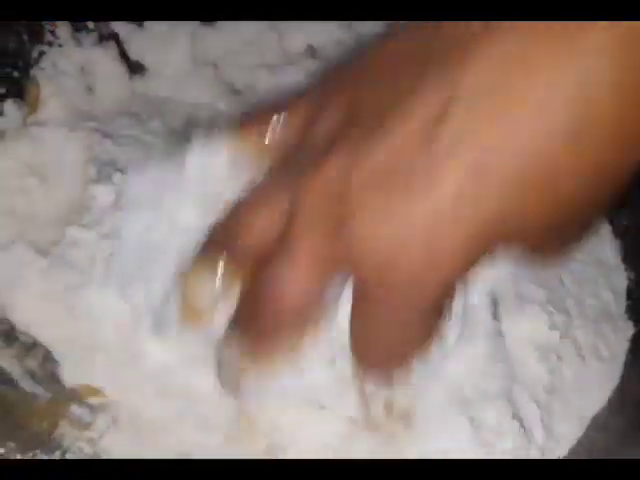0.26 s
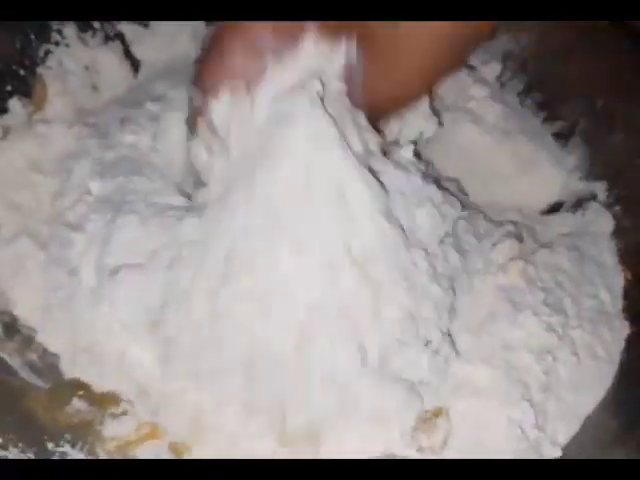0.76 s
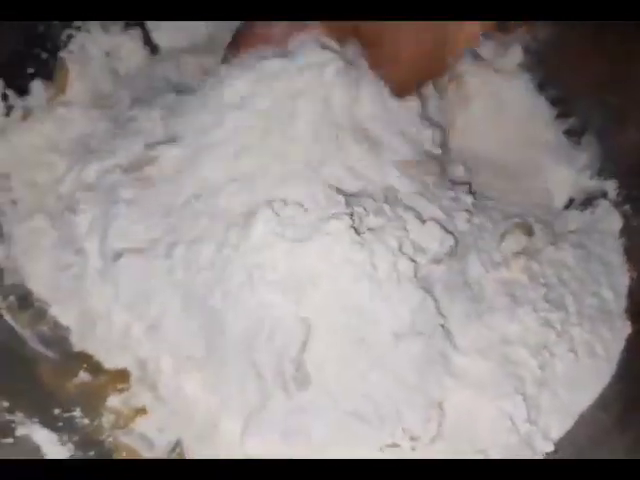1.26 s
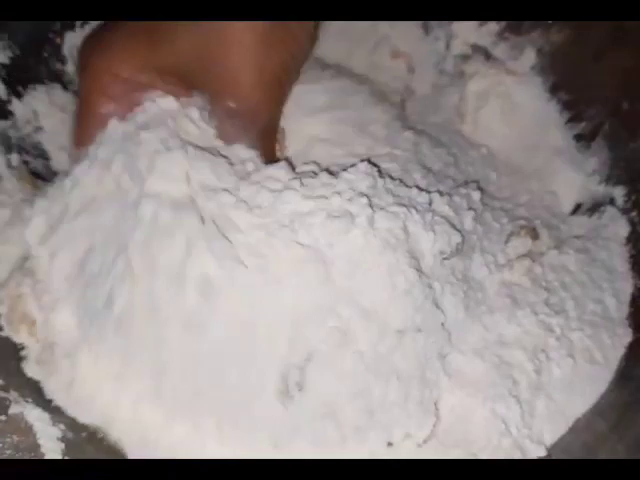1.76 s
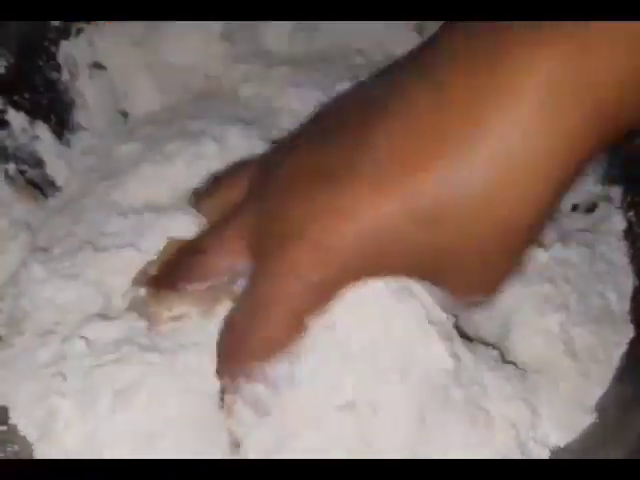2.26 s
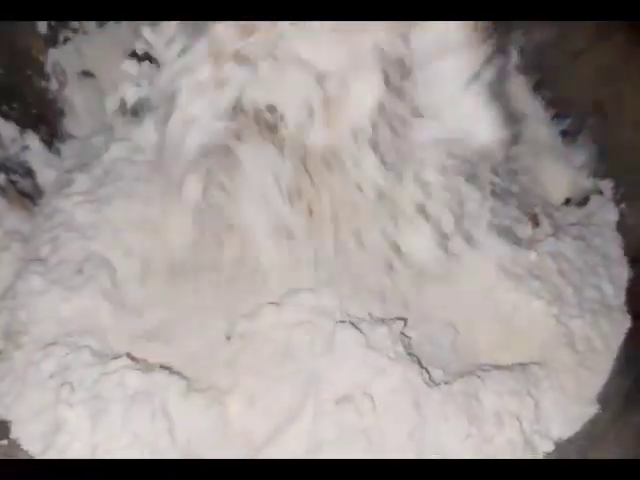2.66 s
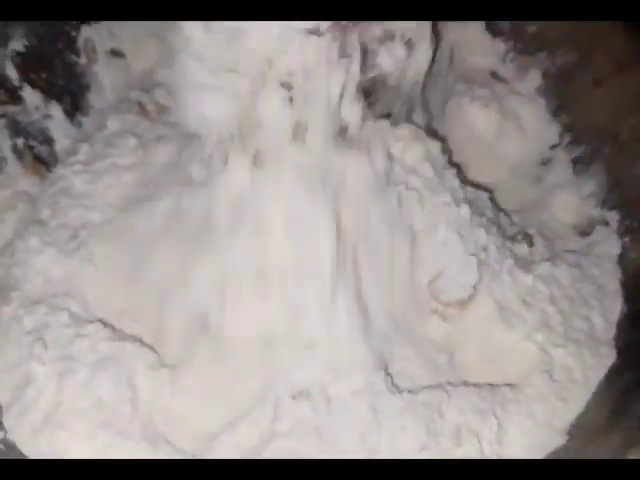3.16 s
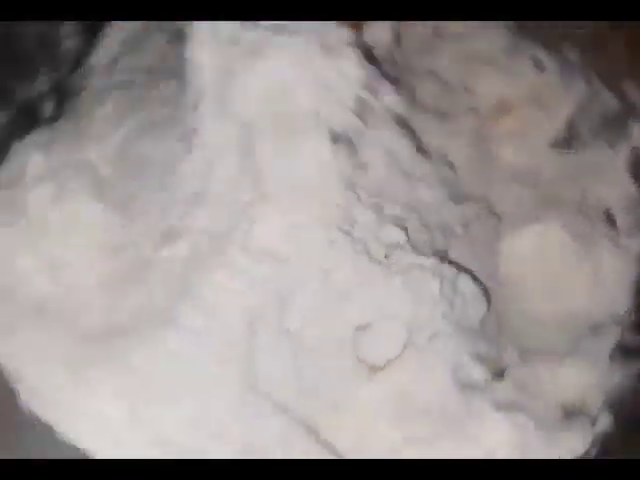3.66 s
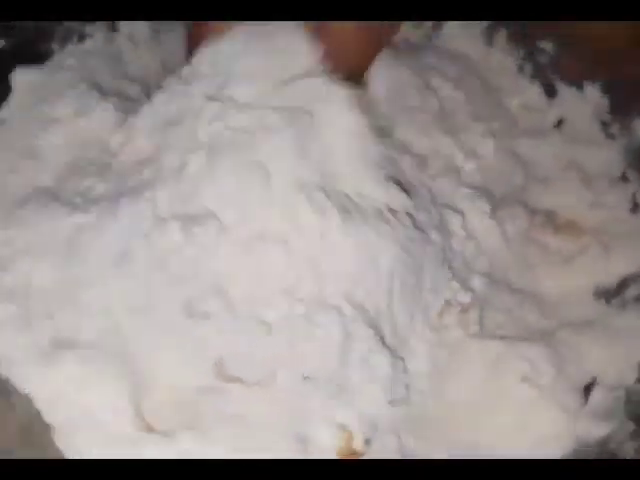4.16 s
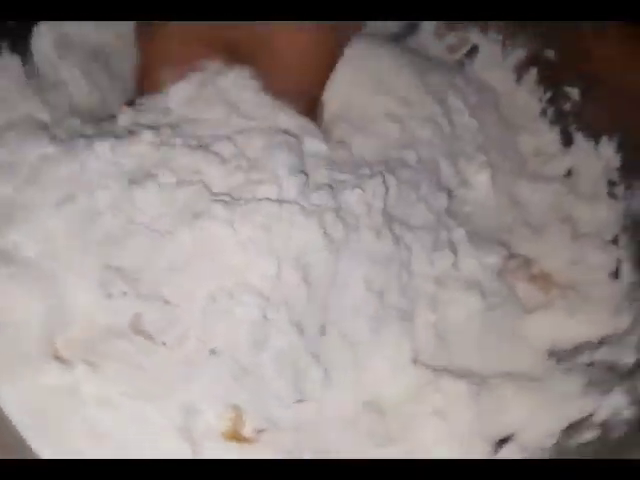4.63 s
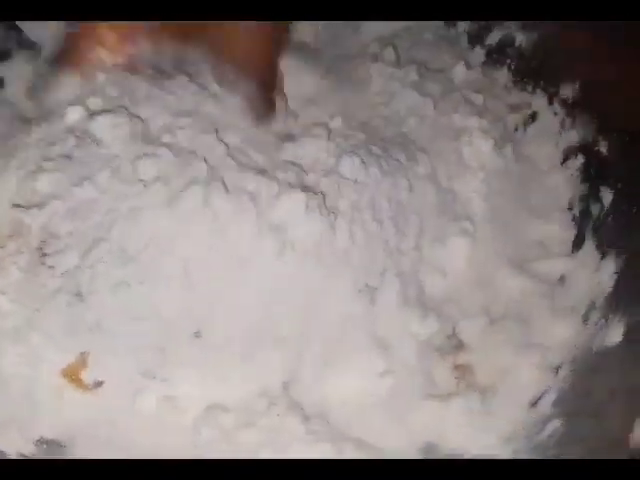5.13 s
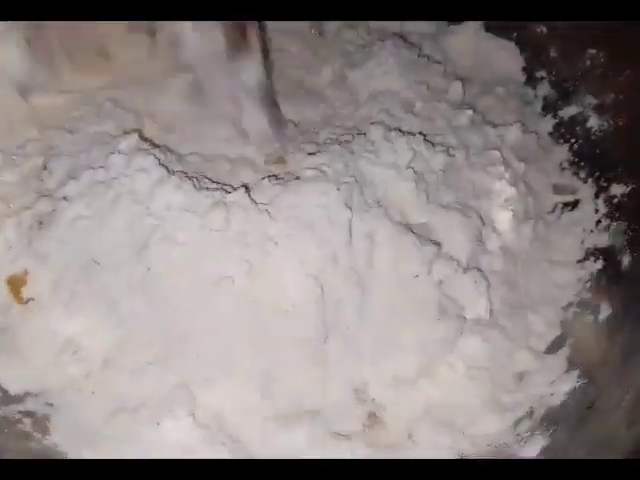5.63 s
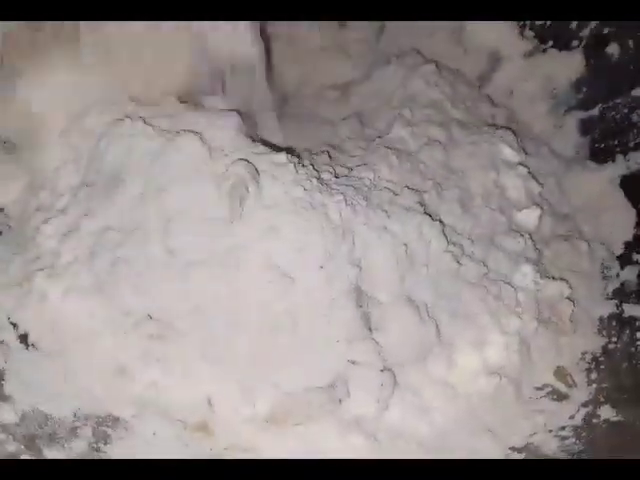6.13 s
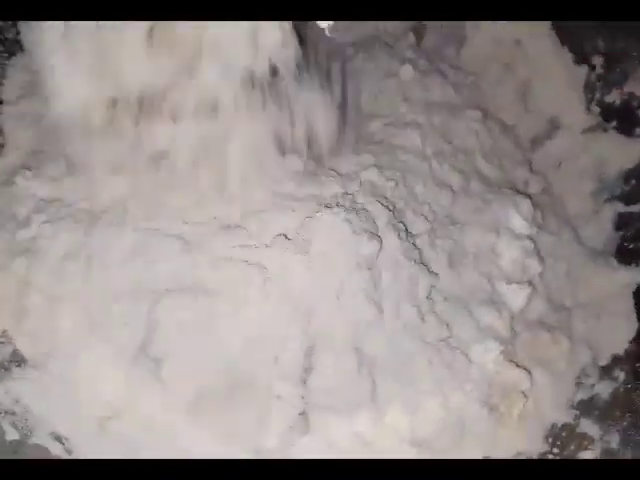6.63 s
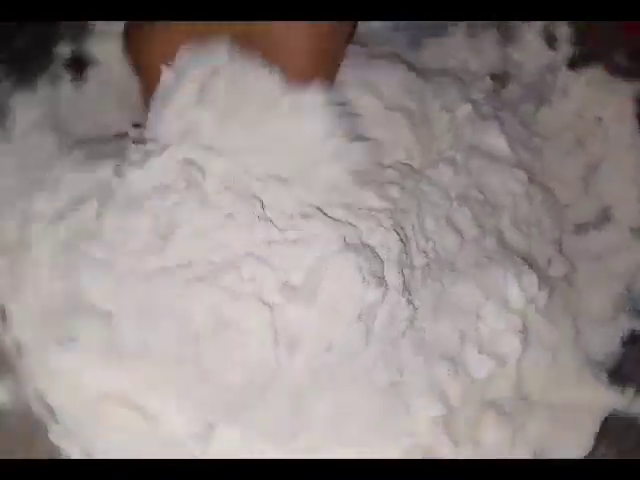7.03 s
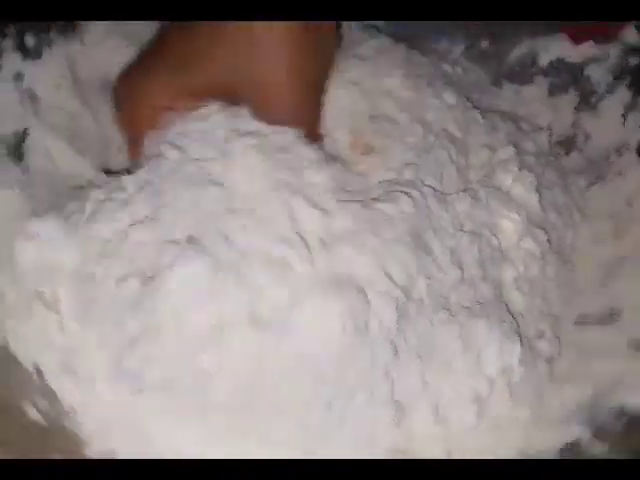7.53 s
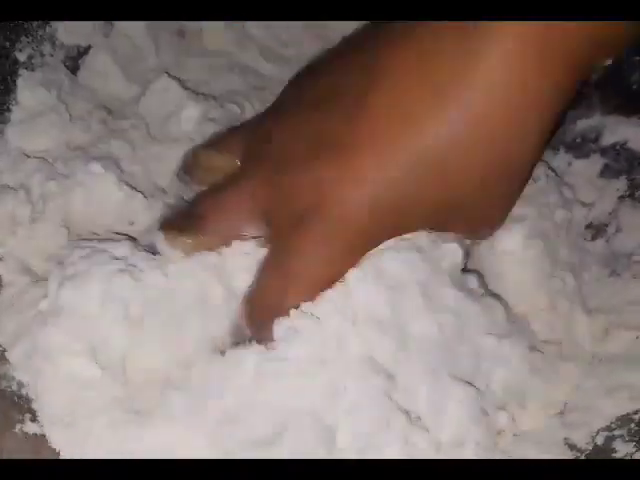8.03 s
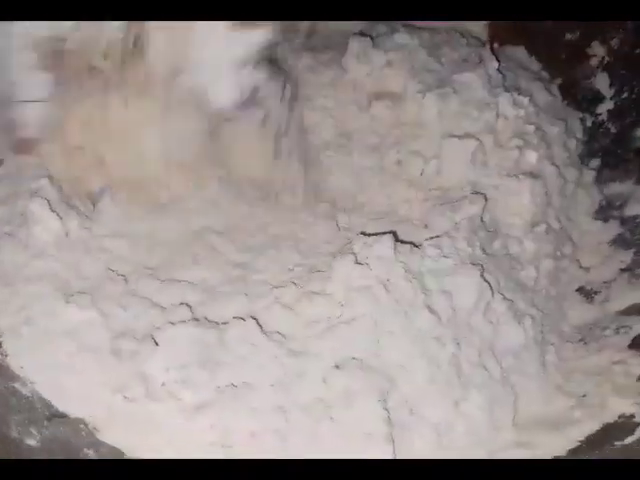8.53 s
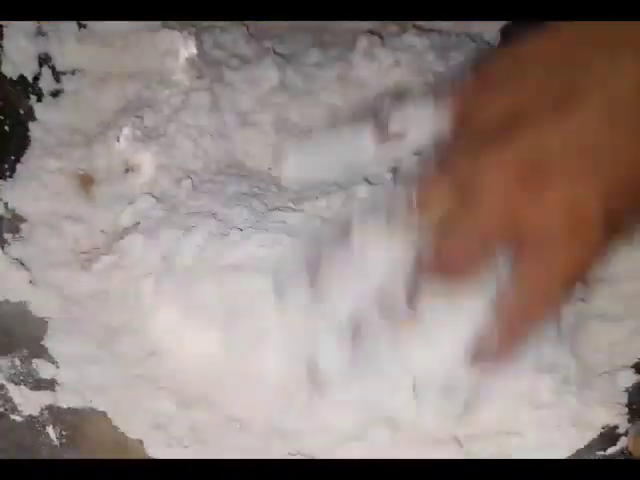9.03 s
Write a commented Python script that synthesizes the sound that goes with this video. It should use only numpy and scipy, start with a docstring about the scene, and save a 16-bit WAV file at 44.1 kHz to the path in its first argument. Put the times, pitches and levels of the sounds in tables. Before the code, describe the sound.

Close by in a small kitchen with a faint low rush, a hand rubs fat into flour in a wide metal bowl. Gritty strokes, fizzy above and crunchy beneath, come every half second or so, each with a soft deep thud. Dull bowl knocks land at 0.7, 1.3 and 1.8 s, the strongest at 1.3; a brief skid rubs at 1.1. From 2 to 2.7 s it is quieter, with a weak stroke and soft flour swishes. Scrunching returns at 2.8, with a sharp lump crack at 3.9 and a clack at 4.1. A thin fuzzy squeak sounds at 4.3; at 4.8 a knock rings the metal. Regular, fuller scrunches follow at 5.0, 5.3, 5.6, 6.2, 6.8 and 7.3 s, with cracking lumps, knocks and a skid at 6.9. A hard clacking knock hits at 7.4, another at 8.0, then softer rubs, a knock at 8.85 and a light final stroke after 9.2.

```python
"""Gritty scrunching strokes over a faint kitchen rush: a hand rubs ghee into flour in a wide metal bowl.
Powder is filtered grain noise under a pressure envelope; lumps and crumbs crack as short bursts.
Soft thuds are damped low modes of the base; knocks add dull blows, clacks and ringing wall modes.
Swishes of loose flour, skids of the base and one thin squeak are shaped noise, clicks and a fuzzy tone.
The contacts, thuds and squeak reach two ports with a lag; contacts also excite the small kitchen."""
import sys
import numpy as np
from scipy import signal
from scipy.fft import rfft, irfft
from scipy.io import wavfile

SR = 44100
rng = np.random.default_rng(int(sys.argv[2]) if len(sys.argv) > 2 else 0)


def generate_wav(signal):
    """Clip the signal to [-1, 1] and save it as 16-bit WAV at the path in sys.argv[1]."""
    frames = np.transpose(np.atleast_2d(signal))
    scaled = np.clip(frames, -1, 1) * 32767
    pcm = np.round(scaled).astype(np.int16)
    wavfile.write(sys.argv[1], SR, pcm)


N = 409688
TIME = np.arange(N) / SR  # [s]
BINS = np.fft.rfftfreq(N, 1 / SR)  # [Hz]
PORT_LAG = 0.00032  # delay of the right port [s]

# modes of the bowl's wall: (frequency [Hz], relative level [dB], t60 [s])
BOWL_MODES = [(619, 0, .2), (712, 5, .16), (917, 3, .28), (1139, 4, .24), (1292, 2, .2), (1367, -1, .2),
              (1438, -2, .22), (1497, -6, .3), (1632, 3, .22), (1846, -1, .3), (2035, -3, .26),
              (2064, -4, .24), (2132, -1, .22), (2350, -5, .2), (2430, -8, .2), (2529, -3, .25),
              (2925, -2.5, .2), (3010, -5, .2), (3128, -7, .25), (3640, -11, .3), (3795, -10, .2),
              (4043, -5, .26), (4818, -10, .22), (5500, -10, .2), (6794, -12, .18), (7260, -12, .2),
              (8958, -15, .22), (10147, -14, .2)]
# spectrum of a dull blow of the base: (frequency [Hz], relative level [dB])
BLOW_COLOUR = [(25, -42), (70, 0), (160, -31.5), (330, 2.5), (470, -8.5), (700, 2), (920, 7), (1150, 1),
               (1500, -2.5), (2500, -79), (6000, -81)]
# left-right likeness of the background and of the base's rumble: (frequency [Hz], likeness [0-1])
AIR_LIKENESS = [(100, 0.83), (300, 0.9), (700, 0.08), (1500, 0), (8000, 0)]


def amp(db):
    """Level to amplitude: 20 dB is a factor of ten."""
    return 10 ** (np.asarray(db) / 20)


def unit(x):
    """Normalization of mean power: scales to rms 1."""
    return x / np.sqrt(np.mean(x ** 2) + 1e-20)


def read(points, hz):
    """Interpolation of a spectrum along a logarithmic frequency axis."""
    f, value = np.transpose(points)
    return np.interp(np.log(hz + 1), np.log(np.sort(f) + 1), value)


def add(mix, s, sound):
    """Superposition: adds a sound to the mix from time s."""
    part = mix[max(round(s * SR), 0):][:len(sound)]
    part += sound[:len(part)]


def wander(rate_hz):
    """Low-pass noise: a random fluctuation of rms 1 that fades out above rate_hz."""
    spectrum = rfft(rng.standard_normal(N)) / (1 + (BINS / rate_hz) ** 4)
    return unit(irfft(spectrum, N))


def minimum_phase(log_gain):
    """Causality: the Hilbert transform of log gain gives the phase of the earliest response."""
    return np.exp(np.conj(signal.hilbert(log_gain)))


def click(colour, size=4096):
    """Minimum-phase impulse of a given spectrum, with the energy of rms 1 held for 10 ms."""
    log_gain = np.log(amp(read(colour, abs(np.fft.fftfreq(size, 1 / SR)))))
    pulse = np.fft.ifft(minimum_phase(log_gain)).real
    return pulse / np.linalg.norm(pulse) * np.sqrt(SR / 100)


def chatter(colour, rise, decay):
    """Extended contact: many tiny slips within milliseconds spread one click in time."""
    t = np.arange(SR // 16) / SR
    envelope = (1 - np.exp(-t / rise)) * np.exp(-t / decay)
    spectrum = np.fft.fft(rng.standard_normal(len(t)) * envelope)
    # dividing by a minimum-phase root of the slips' magnitude evens out half their colour in dB
    root = np.exp(np.conj(signal.hilbert(np.log(abs(spectrum)))) / 2)
    slips = np.fft.ifft(spectrum / root).real
    return signal.fftconvolve(slips / np.linalg.norm(slips), click(colour))


def spread(first, second, colour, same, lag):
    """Partial coherence: two unrelated signals blend into a coloured, partly alike stereo pair."""
    likeness = np.clip(read(same, BINS), 0, 1)
    left, other = rfft(unit(first)), rfft(unit(second))
    right = likeness * left + np.sqrt(1 - likeness ** 2) * other
    right = right * np.exp(-2j * np.pi * BINS * lag)
    return unit(irfft(np.array([left, right]) * amp(read(colour, BINS)), N))


def grains(per_s, size_db, hiss):
    """Granular friction: random slips of uneven size over a smooth hiss."""
    sizes = amp(size_db * np.minimum(rng.exponential(1, N), 4)) * rng.choice([-1, 1], N)
    slips = sizes * (rng.random(N) < per_s / SR)
    return unit(slips) + hiss * rng.standard_normal(N)


def pressure_db(start, rise, ease):
    """Contact force of one stroke: a light touch, an arch up to full pressure, then easing off."""
    lead_db_per_s, touch_db = 650, -12
    ease_db, ease_curve = -23, 1.35  # pressure change after one ease time, and its bend
    t = TIME - start
    lead = lead_db_per_s * np.minimum(t, 0)
    arch = touch_db * np.clip(1 - t / rise, 0, 1) ** 2
    release = ease_db * np.maximum((t - rise) / ease, 0) ** ease_curve
    return lead + arch + release


def stroke_levels():
    """Power summation of overlapping strokes: fizz, crunch and scrape levels follow pressure, in dB."""
    # the hand's strokes: (start [s], time to full pressure [s], time to ease off [s],
    # relative levels of sliding powder's fizz [dB], squeezed powder's crunch [dB], scrape on the bowl [dB])
    strokes = [(-.04, .15, 0.21, -49.5, -50.5, -46), (0.549, 0.026, 0.34, -54.5, -54, -49.5),
               (1.057, 0.11, 0.17, -48, -50.5, -45.5), (1.29, 0.03, 0.16, -64, -49, -42),
               (1.61, 0.019, 0.29, -46, -46, -38), (2.21, 0.012, 0.9, -63, -56.5, -48.5),
               (2.811, 0.087, 0.28, -47, -46.5, -40), (3.14, 0.026, 0.44, -63, -57, -51),
               (3.34, 0.11, 0.31, -48, -46.5, -44), (3.69, 0.11, 0.29, -60.5, -62.5, -48),
               (3.864, 0.023, 0.48, -46, -46, -42.5), (3.97, 0.13, 0.25, -50, -48.5, -46),
               (4.459, 0.13, 0.21, -44.5, -41.5, -42), (4.6, 0.14, 0.34, -55, -47, -43),
               (5.01, 0.19, 0.21, -48.5, -47.5, -43), (5.259, 0.019, 0.084, -49.5, -41.5, -39.5),
               (5.593, .115, 0.3, -46.5, -45.5, -39.5), (6.167, 0.072, 0.31, -45, -46.5, -45),
               (6.76, 0.15, 0.28, -45, -45, -40.5), (7.307, 0.11, 0.35, -47.5, -47, -40.5),
               (7.995, 0.091, 0.34, -57.5, -51.5, -48), (8.58, 0.19, 0.19, -50.5, -51, -47.5),
               (8.82, 0.025, 0.53, -54, -55, -47.5), (9.235, 0.038, .2, -56, -61, -53)]
    # level change per dB of pressure: (fizz [dB/dB], crunch [dB/dB], scrape [dB/dB])
    follow = (1.525, 1, 0.93)
    power = np.full((3, N), 1e-9)
    for start, rise, ease, *levels in strokes:
        first = max(round((start - .1) * SR), 0)
        span = slice(first, round((start + rise + 2 * ease) * SR))
        pressure = pressure_db(start, rise, ease)[span]
        level_db = np.array(levels)[:, None] + np.outer(follow, pressure)
        power[:, span] += amp(level_db) ** 2
    return 10 * np.log10(power)


def sing(x, share, width_hz):
    """Resonance: rubbing feeds the wall's modes, which stand out of the hiss."""
    peaks = sum(amp(db / 4) / (1 + 2j * (BINS - hz) / width_hz) for hz, db, _ in BOWL_MODES)
    return irfft(rfft(x) * (1 + share * peaks), N)


def powder(fizz_db, crunch_db, scrape_db):
    """Granular friction: flour slides, packs and scrapes along the bowl, giving way in clumps."""
    # spectra of the three layers: (frequency [Hz], relative level [dB])
    fizz_colour = [(2500, -30), (4000, 6), (5300, 10.5), (6800, 10), (8200, -1), (11500, 4), (14000, 2.5),
                   (16000, -5)]
    crunch_colour = [(900, -7), (1500, 5), (2200, 5), (3400, 5), (4800, 2.5), (6200, -18.5), (8000, -3),
                     (12000, -48)]
    scrape_colour = [(60, -35), (170, -16), (310, 12.5), (480, -1.5), (720, 1.5), (930, 2), (1130, -0.5),
                     (1500, -6.5), (2500, -58)]
    # spectrum of the base's trembling: (frequency [Hz], relative level [dB])
    rumble_colour = [(20, -37), (35, -27), (52, -9.5), (75, -12), (93, 1), (108, -10.5), (122, -7),
                     (160, -10.5), (300, -23), (900, -46)]
    # left-right likeness of the strokes: (frequency [Hz], likeness [0-1])
    stroke_likeness = [(100, .97), (300, 0.96), (700, 0.17), (1100, 0.61), (2500, 0.042), (15000, 0.031)]
    clumps = wander(rate_hz=48)

    def layer(level_db, colour, per_s, size_db, clump_db):
        """Amplitude modulation: grain noise swells and sinks with the shared clumps."""
        pair = [grains(per_s, size_db, hiss=0.59) for _ in range(2)]
        unevenness = clumps + 0.08 * wander(rate_hz=87)
        gain = amp(level_db + clump_db * unevenness)
        return gain * spread(*pair, colour, stroke_likeness, PORT_LAG)

    fizz = layer(fizz_db + 5.5, fizz_colour, per_s=2700, size_db=-3.0, clump_db=1.2)
    crunch = layer(crunch_db - .8, crunch_colour, per_s=1100, size_db=2.0, clump_db=1.13)
    scrape = layer(scrape_db - .5, scrape_colour, per_s=500, size_db=2.0, clump_db=2.5)
    # the moving hand also keeps the base of the bowl trembling
    tremble = spread(*rng.standard_normal((2, N)), rumble_colour, AIR_LIKENESS, PORT_LAG)
    rumble = amp(.6 * scrape_db - 18) * tremble
    return sing(fizz + crunch + scrape, share=0.82, width_hz=11.0) + rumble


def lumps(crunch_db):
    """Brittle fracture: lumps of fat and flour crack; random crumbs break louder under a harder squeeze."""
    # the biggest lumps crack: (time [s], level [dB])
    snaps = [(1.606, -41.5), (1.631, -37.5), (2.945, -56), (3.285, -48.5), (3.695, -60), (3.874, -33.5),
             (5.6, -42), (6.165, -32), (6.789, -36.5), (7.349, -42), (8.709, -41)]
    # spectrum of a crack: (frequency [Hz], relative level [dB])
    snap_colour = [(100, -4.5), (350, 12.5), (1000, 7.5), (1800, -13), (5200, 15), (8500, -11), (16000, -7)]
    crumbs_per_s = 45
    crumb_db, crumb_spread_db = -1, 3  # level against the crunch, and spread of size
    cracks = np.zeros(N)
    for s, db in snaps:
        add(cracks, s, amp(db) * chatter(snap_colour, rise=0.0012, decay=0.0018))
    luck = np.clip(rng.standard_normal(N), -2, 2)
    sizes = amp(crunch_db + crumb_db + crumb_spread_db * luck)
    crumbs = sizes * (rng.random(N) < crumbs_per_s / SR)
    crumb_sound = chatter(snap_colour, rise=0.00034, decay=0.0021)
    return cracks + signal.oaconvolve(crumbs, crumb_sound)[:N]


def air():
    """Diffuse background noise: a low rush whose level wavers slightly."""
    # spectrum of the background: (frequency [Hz], relative level [dB])
    air_colour = [(15, -33), (25, -33), (86, -7), (221, -8), (305, 1.5), (469, -6.5), (631, -12.5),
                  (782, -11), (1710, -24), (2700, -28.5), (3530, -35), (5430, -30), (8350, -40),
                  (13500, -33), (15500, -44)]
    # left minus right of the background: (frequency [Hz], level difference [dB])
    air_balance = [(60, 16), (180, -8), (550, -1), (1650, 0), (4970, -8), (15000, -2)]
    pair = spread(*rng.standard_normal((2, N)), air_colour, AIR_LIKENESS, 0)
    lean = amp(np.outer([.5, -.5], read(air_balance, BINS)))
    level_db = -51.67 + 0.21 * wander(rate_hz=12)
    return amp(level_db) * irfft(rfft(pair) * lean, N)


def thuds():
    """Damped forced modes: a soft push or a knock swells the low modes of the base; hand and flour damp them."""
    # the hand presses the bowl down, or a knock sets the base ringing: (time [s], level before the mode's own
    # [dB], decay length [s])
    base_thuds = [(0.582, -30.5, 0.096), (0.646, -20.5, 0.1), (1.193, -32, 0.042), (1.278, -23.5, 0.069),
                  (1.63, -19.5, .12), (2.226, -30, 0.032), (2.292, -25, 0.12), (2.945, -23.5, 0.091),
                  (3.14, -28.5, 0.098), (3.27, -32, 0.073), (3.434, -30, 0.12), (3.699, -21, .14),
                  (3.913, -30, 0.053), (4.019, -33, 0.14), (4.505, -26.5, 0.15), (4.764, -18, 0.079),
                  (5.145, -24, 0.025), (5.194, -24, 0.077), (5.675, -26.5, 0.062), (5.773, -26.5, 0.045),
                  (6.169, -35, 0.08), (6.276, -26, 0.065), (6.784, -27.5, 0.11), (6.868, -26.5, 0.13),
                  (7.343, -30.5, 0.096), (7.424, -30.5, 0.17), (7.98, -40, 0.042), (8.844, -18.5, 0.014)]
    # modes of the base under the flour: (multiple of the thud's pitch [1], level [dB], length factor [1])
    base_modes = [(.6, -14, 0.95), (1.002, -0.5, 0.99), (1.31, -15.5, 1)]
    pitch_hz, rise_s = 93.2, 0.0088
    pitch_scatter = 0.017  # share by which the pitch varies with the grip
    out, t = np.zeros(N), np.arange(SR // 2) / SR
    for (s, db, length), grip in zip(base_thuds, rng.standard_normal(len(base_thuds))):
        hz = pitch_hz * (1 + pitch_scatter * grip)
        for ratio, mode_db, factor in base_modes:
            swell = 1 - np.exp(-(t / rise_s) ** 2)
            damping = np.exp(-(t / (length * factor)) ** 2)
            tone = np.sin(2 * np.pi * hz * ratio * t)
            add(out, s, amp(db + mode_db) * swell * damping * tone)
    return out


def knocks():
    """Impact excitation: a thump, dull blow, gritty clack and tick, with the wall's modes ringing."""
    # the bowl knocks on the surface below: (time [s], relative levels of the foot's thump [dB], body [dB],
    # clack [dB], sharp tick [dB], metal ring [dB], frequency that the struck spot favours [Hz])
    hits = [(.641, -37.5, -45, -53, -64, -59, 917), (0.7101, -49, -21, -37.5, -49, -52.5, 1135),
            (1.2718, -40, -12.5, -28.5, -36, -47, 1292), (1.766, -45, -13, -32.5, -50, -37.5, 2870),
            (2.689, -48, -40, -66, -63, -70, 917), (3.451, -38, -38.5, -48, -35.5, -72, 4818),
            (3.887, -35, -43, -65, -43, -62, 4818), (4.1089, -44, -29.5, -34.5, -35.5, -48, 3010),
            (4.204, -47, -57, -46, -43.5, -55.5, 3010), (4.227, -49, -44, -57, -46.5, -68, 2529),
            (4.486, -48, -29.5, -48, -38.5, -47, 1292), (4.766, -39.5, -23.5, -34, -30, -37, 2132),
            (5.1855, -42, -18.5, -44, -49, -44.5, 1631), (5.783, -37, -29.5, -39.5, -44, -49, 1135),
            (6.863, -40, -19, -35, -48, -50, 917), (6.968, -48, -24.5, -34.5, -60, -54, 2925),
            (7.029, -52, -46, -44, -38, -52.5, 4043), (7.4443, -30.5, -25, -27.5, -35, -40, 2090),
            (7.985, -34, -30, -33, -42, -41.5, 2400), (8.847, -35, -32.5, -44.5, -33.5, -58, 1135),
            (9.246, -57, -65, -56, -40, -76, 6794)]
    # low modes of the bowl on its foot: (frequency [Hz], relative level [dB], t60 [s])
    foot_modes = [(123, 3.5, 0.28), (181, -1.5, 0.14), (283, 4, 0.18), (385, 5, 0.063)]
    # spectra of the two gritty contacts: (frequency [Hz], relative level [dB])
    clack_colour = [(150, -37), (400, -33), (800, -42), (1400, 6), (2100, 11), (3000, 4.5), (4300, 12),
                    (5500, 7), (8000, -2), (16000, -36)]
    tick_colour = [(1500, -33), (3800, 14), (5200, 15), (7000, 12), (8500, 5.5), (12000, 8.5), (16000, 1.5)]
    # two knocks also catch the bare rim: (time [s], level [dB])
    rim_hits = [(4.767, -31.5), (5.783, -41)]
    rim_hz, rim_t60 = 1098, .8
    spot_db = 13.5  # greatest lift of the modes that the struck spot favours
    # the bowl is not quite round: each mode has a weaker twin, scattered about it in pitch
    split_hz, twin_db = 19.7, -2.5
    blows, cracks, rings = np.zeros((3, N))
    t, blow = np.arange(SR) / SR, click(BLOW_COLOUR)
    thump = sum(amp(db - 60 * t / t60) * np.sin(2 * np.pi * hz * t) for hz, db, t60 in foot_modes)
    thump = (1 - np.exp(-t / 0.0058)) * thump
    for s, db in rim_hits:
        # the bare rim, clear of the flour, hums on longer
        add(rings, s, amp(db - 60 * t / rim_t60) * np.sin(2 * np.pi * rim_hz * t))
    t = t[:SR // 3]
    for s, thump_db, body_db, clack_db, tick_db, ring_db, spot_hz in hits:
        add(rings, s, amp(thump_db) * thump)
        add(blows, s, amp(body_db) * blow)
        add(cracks, s, amp(clack_db) * chatter(clack_colour, rise=0.00055, decay=0.0023))
        add(cracks, s, amp(tick_db) * chatter(tick_colour, rise=0.0019, decay=0.0019))
        chances = rng.standard_normal((len(BOWL_MODES), 3))
        for (hz, db, t60), (luck, phase, split) in zip(BOWL_MODES, chances):
            # where the bowl is struck decides which modes speak most
            favour_db = spot_db * np.exp(-(np.log(hz / spot_hz) / 0.025) ** 2)
            mode = np.sin(2 * np.pi * hz * t + phase)
            twin = amp(twin_db) * np.cos(2 * np.pi * (hz + split_hz * split) * t)
            level_db = ring_db + db + favour_db + 1.8 * luck - 60 * t / t60
            add(rings, s, amp(level_db) * (mode + twin))
    return blows, cracks, rings


def swishes():
    """Band-pass noise: loose flour slides off the heap in smooth swells of hiss around one pitch."""
    # slides of loose flour: (middle [s], half length [s], level [dB], centre frequency [Hz])
    slides = [(.94, 0.048, -65, 2900), (1.534, .04, -61, 4930), (2.081, 0.088, -57, 3000),
              (2.19, 0.047, -53, 3360), (2.492, 0.046, -47.5, 6250), (2.616, 0.053, -49, 5300),
              (3.194, 0.063, -47.5, 6250), (3.369, .04, -45, 5500), (4.643, .025, -37.5, 2400),
              (4.872, 0.18, -51, 2330), (7.624, .05, -55, 5000), (9.123, 0.063, -48.5, 6700)]
    width, top_hz = 0.33, 7730  # bandwidth as a share of the pitch; dark above the top
    out = np.zeros((2, N))
    t, bins = np.arange(SR) / SR - .5, np.fft.rfftfreq(SR, 1 / SR)
    for s, length, db, hz in slides:
        band = 1 / (1 + 2j * (bins - hz) / (width * hz))
        colour = band / (1 + (bins / top_hz) ** 16)
        hiss = unit(irfft(rfft(rng.standard_normal((2, SR))) * colour, SR))
        for port, sound in zip(out, hiss):
            add(port, s - .5, amp(db) * np.exp(-(t / length) ** 2) * sound)
    return out


def skid():
    """Stick-slip friction: the base skids in a quick run of tiny blows that swells and fades."""
    # the bowl skids on the surface below: (start [s], length [s], level [dB])
    skids = [(1.124, 0.046, -41.5), (2.846, 0.059, -41), (6.869, 0.11, -33)]
    swell = np.zeros(N)
    for s, length, db in skids:
        progress = np.clip((TIME - s) / length, 0, 1)
        swell += amp(db) * np.sqrt(abs(np.sin(np.pi * progress)))
    slips = grains(per_s=340, size_db=5.0, hiss=0.24)
    return swell * unit(signal.oaconvolve(slips, click(BLOW_COLOUR))[:N])


def squeak():
    """Narrow-band modulation: noise on two quadrature carriers makes a fuzzy tone that swells and fades."""
    start_s, length_s, rise_s = 4.285, .21, .035
    pitch_hz, level_db, fade_db_per_s = 2008, -49.5, 60
    t, turn = TIME - start_s, 2 * np.pi * pitch_hz * TIME
    tone = (.8 + .6 * wander(rate_hz=70)) * np.sin(turn)
    tone += .7 * wander(rate_hz=70) * np.cos(turn)
    gate = np.clip(np.minimum(t, length_s - t) / rise_s, 0, 1)
    return amp(level_db - fade_db_per_s * np.maximum(t, 0)) * gate * tone


def ports(x, side_db):
    """Interaural differences: a near sound is earlier and louder at the left port."""
    late = irfft(rfft(x) * np.exp(-2j * np.pi * BINS * PORT_LAG), N)
    return np.array([x * amp(side_db), late / amp(side_db)])


def flutter(x, period, feedback, dull_hz):
    """Flutter echo: a blow bounces to and fro between hard surfaces, duller each time."""
    delay = np.exp(-2j * np.pi * BINS * period)
    loop = feedback * delay / (1 + (BINS / dull_hz) ** 2)
    return irfft(rfft(x) / (1 - loop), N)


def kitchen(x, early_db, early_s):
    """Reverberation: dense early reflections, then a tail whose bands die at their own speeds."""
    # the kitchen's decay: (frequency [Hz], t60 [s])
    decay_times = [(100, 0.26), (400, 0.4), (1000, 0.35), (4000, 0.18), (8000, 0.16), (15000, 0.12)]
    # left-right likeness of the echo: (frequency [Hz], likeness [0-1])
    room_likeness = [(100, 0), (350, 0.93), (700, 1), (1400, 0.98), (8000, 0.06)]
    taps = rng.standard_normal((2, SR // 2))
    hz, t, bands = signal.stft(taps, SR, nperseg=256)
    same = np.clip(read(room_likeness, hz), 0, 1)[:, None]
    bands[1] = same * bands[0] + np.sqrt(1 - same ** 2) * bands[1]
    decay = amp(-60 * t / read(decay_times, hz)[:, None])
    tail = signal.istft(bands * decay, SR, nperseg=256)[1]
    t = np.arange(tail.shape[1]) / SR
    onset = 1 - np.exp(-(t / 0.0048) ** 2)
    tail *= onset * (1 + amp(early_db) * np.exp(-t / early_s))
    return signal.fftconvolve(x[None], tail / np.linalg.norm(tail[0]), axes=1)[:, :N]


def scene():
    """Superposition of direct sounds, their room echoes, powder, swishes and background."""
    fizz_db, crunch_db, scrape_db = stroke_levels()
    blows, cracks, rings = knocks()
    dull = flutter(blows + skid(), period=0.00449, feedback=0.43, dull_hz=2830)
    bright = cracks + lumps(crunch_db)
    near = ports(dull + rings + bright + thuds() + squeak(), side_db=.5)
    dull_echo = amp(-8) * kitchen(dull + rings / 2, early_db=21, early_s=0.0054)
    bright_echo = amp(-1.0) * kitchen(bright, early_db=25, early_s=0.0025)
    return near + dull_echo + bright_echo + powder(fizz_db, crunch_db, scrape_db) + swishes() + air()


def record(dry):
    """Soft saturation and band limiting: the microphone rounds off the hardest knocks."""
    ceiling, edge_hz = .9, 15900
    rounded = dry / (1 + (dry / ceiling) ** 4) ** (1 / 4)
    lowpass = signal.firwin(511, edge_hz, window=("kaiser", 9), fs=SR)
    return signal.oaconvolve(rounded, lowpass[None], "same")


dry = scene()
out = record(dry)
generate_wav(out)
```